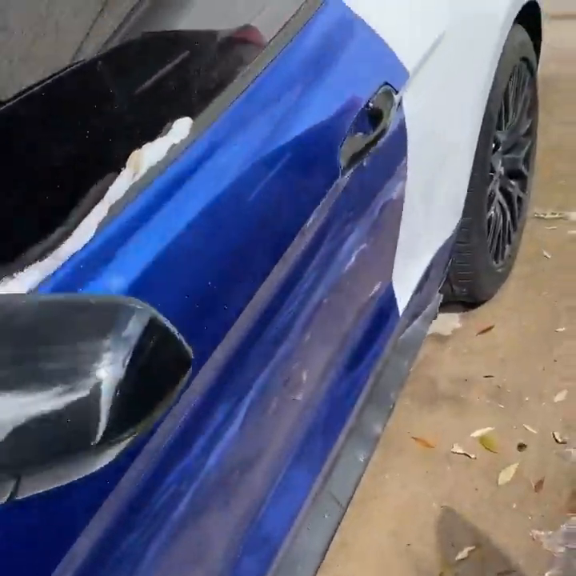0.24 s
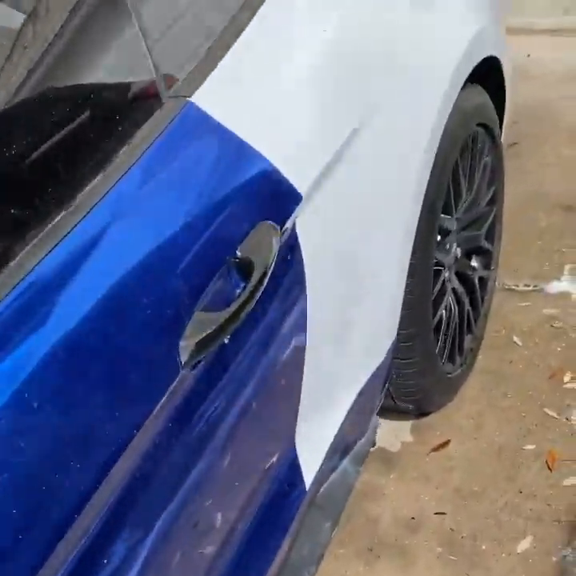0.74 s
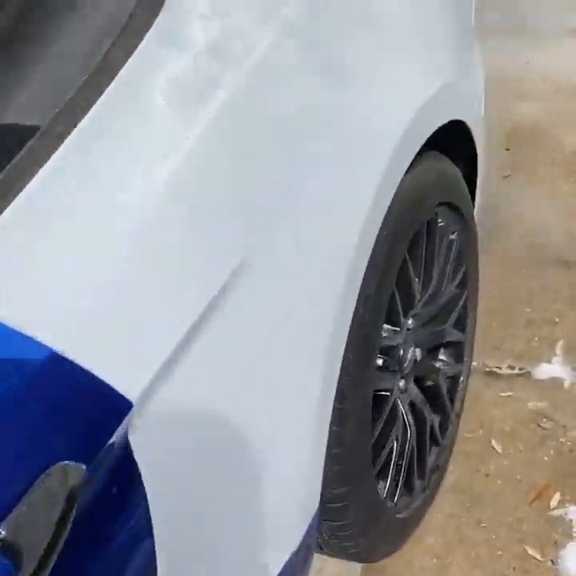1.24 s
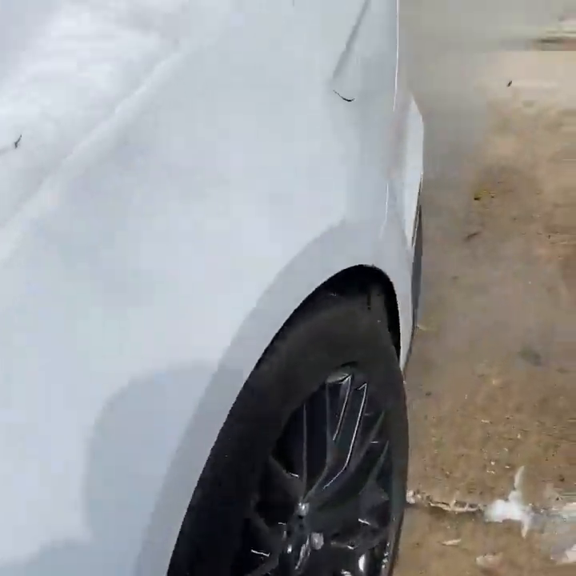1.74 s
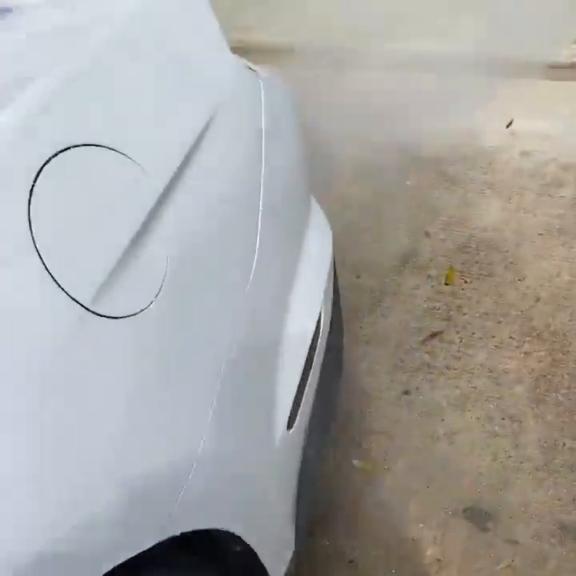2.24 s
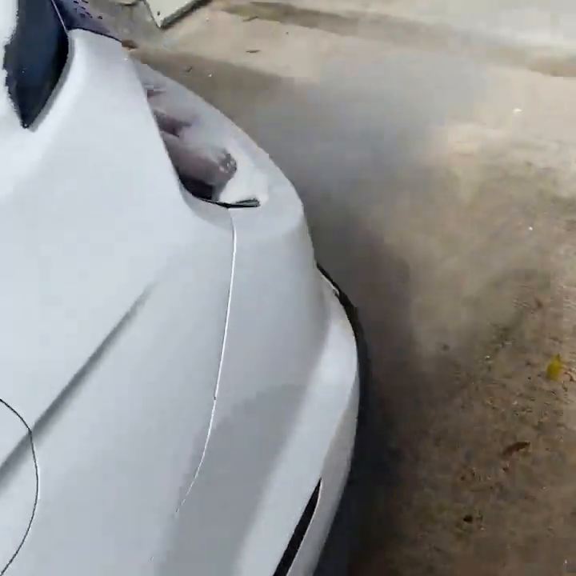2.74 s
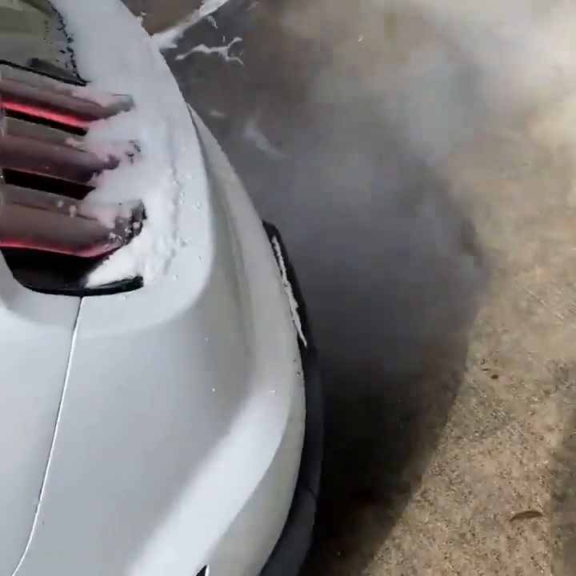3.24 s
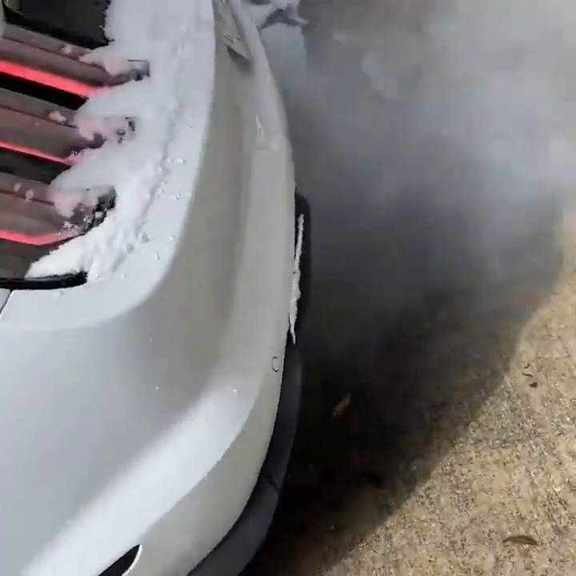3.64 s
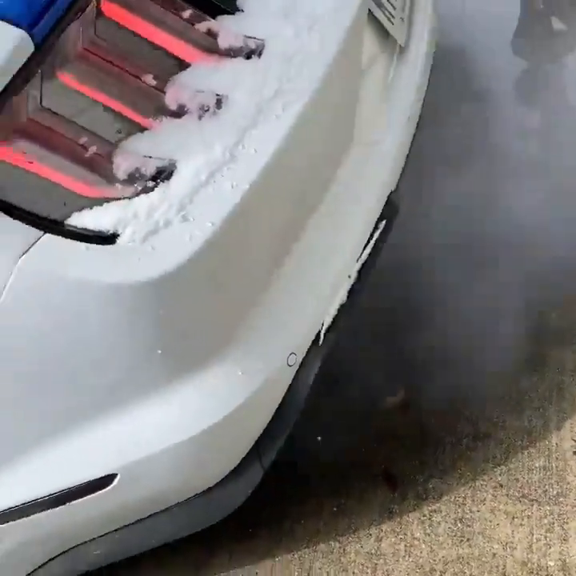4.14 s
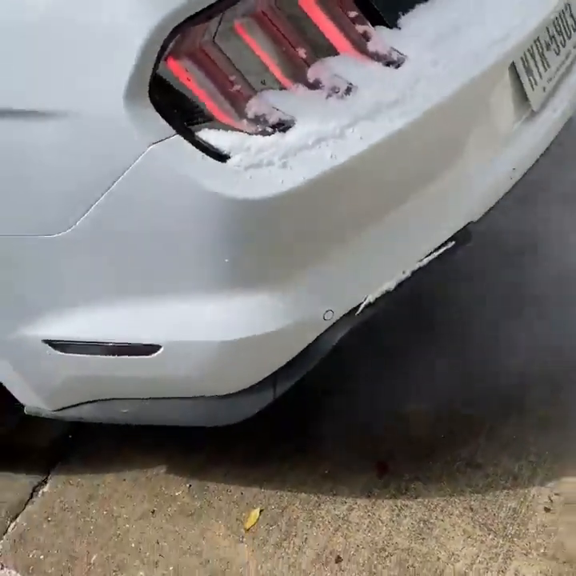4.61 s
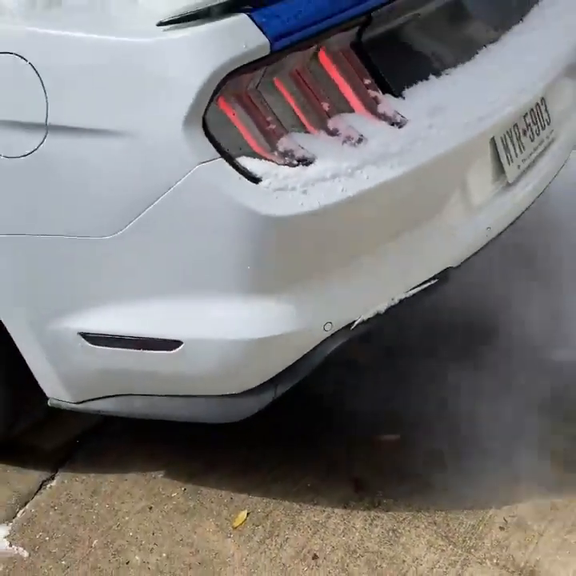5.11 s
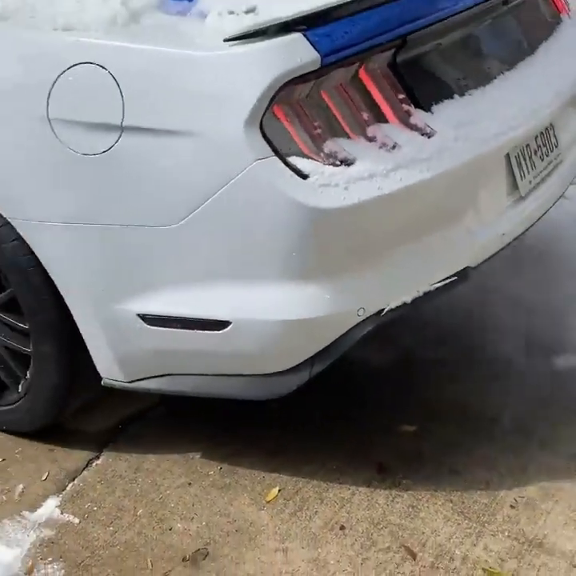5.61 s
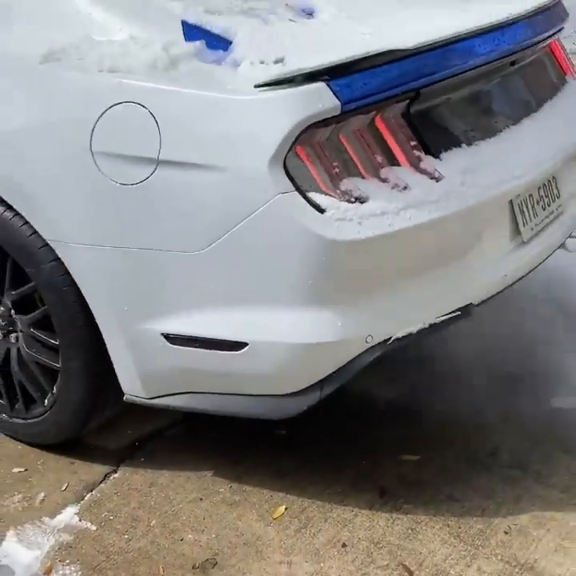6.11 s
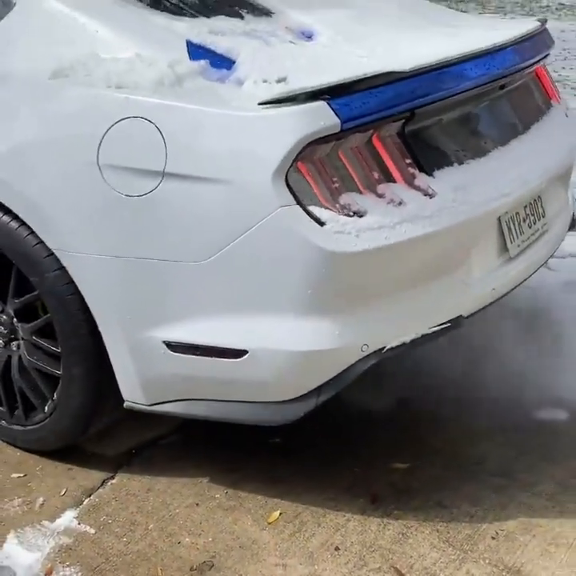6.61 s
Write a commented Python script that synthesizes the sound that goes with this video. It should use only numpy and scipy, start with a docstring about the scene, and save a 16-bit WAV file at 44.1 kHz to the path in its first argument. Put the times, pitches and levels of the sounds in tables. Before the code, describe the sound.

A V8 car with an open exhaust idles on a concrete driveway. Its deep boom and drone throb quickly and evenly, with raspy pops and chuffs on top and a faint hiss below. The close microphone moves from beside the door around the rear bumper, where the boom eases and a brief hollow howl rises. Behind the car, the idle carries on slightly quieter.

```python
"""A V8 with open exhaust pipes idles on a concrete driveway, heard first from beside its door.
From the start, three hard and five softer firings per cycle make the pipe's boom and drone throb
eleven times a second. Firings pop and spit rasping gas, the hard ones chuff, and a thin hiss lies below.
Near 2.6 seconds the microphone rounds the bumper: the boom drops and the space underneath howls briefly.
By about six seconds the microphone is behind the tail, where the engine sounds a little quieter."""
import sys
import numpy as np
from scipy import signal
from scipy.fft import rfft, irfft, next_fast_len
from scipy.io import wavfile
from scipy.ndimage import uniform_filter1d, minimum_filter1d, map_coordinates

SR = 44100
rng = np.random.default_rng(int(sys.argv[2]) if len(sys.argv) > 2 else 0)


def persist_wave(psi):
    """Save psi, clipped to +-1, as 16-bit WAV."""
    counts = np.round(np.clip(psi, -1, 1) * 32767).astype(np.int16)
    wavfile.write(sys.argv[1], SR, np.atleast_2d(counts).T)


N = 302526

# Idle speed. Each row: time in seconds, firings per second.
IDLE_SPEED = [(0, 90.58), (2, 91.77), (2.5, 90.35), (2.8, 91.39), (4.65, 91.59), (5.3, 90.98), (6.86, 91.6)]
# One engine cycle. Each row: a firing's lateness in ms, pressure pulse in dB, gas jet in dB.
CYCLE_FIRINGS = [(-0.272, 3.5, 5.5), (-0.712, 7.5, 5.5), (-0.722, 7, 6.5), (0.104, -3.5, 2.5),
                 (-0.33, -7.5, 1.5), (-0.088, 4, 1.5), (0.036, 1.84, -1), (1.116, 1, 1)]
# Cycles that burn harder and bark. Each row: time in seconds, boost to the firing kicks in dB.
HARD_BURNS = [(0.105, 2.2), (0.195, 2.2), (0.365, 1), (0.45, 1.5), (1.59, 2), (1.94, 2.5), (2.73, 0.9),
              (3.178, 3.8), (3.44, 2.3), (3.7, 1), (3.87, 1.3), (4.04, 2), (4.391, 3), (4.57, 1),
              (4.66, 2.5), (5.09, 3), (5.27, 3), (5.53, 2.2), (5.62, 1.8), (6.15, 1), (6.5, 1), (6.67, 2)]
# The walk. Each row: time in seconds, position from 0 (beside the car) to 1 (behind it).
MIC_POSITION = [(0, 0.0074), (1.8, 0.08), (2.6, 0.46), (3.2, 0.19), (4.6, 0.81), (5.2, 0.78), (5.7, 0.97),
                (6.86, 0.96)]
# How strongly the exhaust reaches the microphone. Each row: time in seconds, level in dB.
EXHAUST_REACH = [(0.1, 4), (0.9, -0.5), (1.7, 1.5), (2.3, 0.9), (3.15, 2), (3.3, -3.5), (4.3, -1),
                 (5.3, -4.5), (6.86, -3.5)]
# The engine's tones. Each row: multiple of the cycle rate, then relative level in dB
# at the three places: beside the car, at its corner, behind it.
ENGINE_TONES = [(4, -41.5, -39.5, -42), (5, -46, -47.5, -51), (6, -44, -41.5, -48), (7, -32, -37.5, -43),
                (8, -5.5, -10.5, -16.5), (9, -36, -34.5, -34.5), (10, -29.5, -30, -30.5),
                (11, -27.5, -29.5, -30), (12, -34, -23, -30.5), (13, -24.5, -24.5, -30.5),
                (14, -29.5, -25.5, -33), (15, -42, -34, -47), (16, -20.5, -22, -24.5),
                (17, -26, -28.5, -29), (18, -20, -25, -24.5), (19, -43, -35.5, -46), (20, -34, -25.5, -32),
                (21, -42, -26, -29), (22, -31, -24, -28), (23, -25.5, -25.5, -24), (24, -18, -14.5, -17.5),
                (25, -19.5, -22.5, -15.5), (26, -30, -23, -25.5), (27, -57, -47, -43),
                (28, -40.5, -50, -46.5), (29, -39, -49.5, -56), (30, -34.5, -35.5, -40),
                (31, -46, -38, -49), (32, -34.5, -35.5, -41.5), (33, -21.5, -24, -36.5),
                (34, -43, -32.5, -34.5), (35, -42, -42, -48), (36, -46, -39.5, -49), (37, -39.5, -34, -43),
                (38, -61, -44.5, -55), (39, -41, -36, -46), (40, -52, -53.5, -58), (41, -52, -50, -53.5),
                (42, -41, -34.5, -41), (43, -36, -38, -42), (44, -40.5, -41, -45.5),
                (45, -37.5, -36, -35.5), (46, -30.5, -38.5, -39.5), (47, -44, -49, -52),
                (48, -45, -57.5, -53.5), (49, -36, -34.5, -52), (50, -46, -45, -52), (51, -38.5, -38, -54),
                (52, -59, -59.5, -55.5), (53, -46.5, -43.5, -50), (54, -61, -53, -57.5),
                (55, -35.5, -35.5, -35), (56, -38, -39, -40.5), (57, -34, -37.5, -34),
                (58, -45.5, -55.5, -52)]
# Standing waves in the pipe. Each row: pitch in Hz, width in Hz, strength with a sign.
PIPE_WAVES = [(80.4, 5.9, 0.52), (118, 12, 0.79), (209.6, 100, -0.048), (276.36, 4.86, -0.193),
              (375, 4.5, 0.043), (417.7, 5.5, .052), (512.7, 50, .125), (554, 26.1, -.2), (645.7, 6, -.046)]
# Where the two tailpipes cancel each other. Each row: time in seconds, pitch in Hz, depth in dB.
PIPE_CANCELLING = [(0.2, 246, 3.5), (0.62, 280, 5.5), (1.1, 250, 3.5), (1.5, 251, 4), (2.1, 256.4, 10.5),
                   (2.55, 276, 14), (2.75, 303, 12), (2.9, 318, 0.5), (6.86, 343, 5)]
# The hum, three tones around the 375 Hz standing wave. Each row: time in seconds, level in dB.
HUM_LOUDNESS = [(0.1, -22), (0.26, -20), (0.75, -22), (1.45, -38.5), (2.0, -20.5), (2.35, -28), (2.7, -18),
                (2.9, -14.5), (3.05, -16), (3.35, -26), (3.6, -29), (4.0, -19), (4.25, -21), (4.5, -26),
                (4.85, -23.5), (5.4, -30.5), (6.3, -38.5), (6.75, -33.5)]
# The honk, the tones from about 420 Hz up. Each row: time in seconds, level in dB.
HONK_LOUDNESS = [(0.2, -23.5), (0.9, -27.5), (1.3, -28), (1.65, -22.5), (2.15, -28.5), (2.5, -24.5),
                 (3.0, -24), (3.4, -28), (3.8, -25.5), (4.45, -25), (5.1, -35.5), (5.7, -29.5), (6.4, -34),
                 (6.8, -33.5)]
# High ringing of pipe and underbody. Each row: pitch in Hz, width in Hz, relative dB at the three places.
HIGH_RINGS = [(749, 45, -13.5, -20, -12), (808.6, 14, -5.5, -14.5, -1), (853, 15, -12, -8, -3.5),
              (945, 17.3, -4, -2.5, -12), (987, 18.6, -10, -1.5, -12.5), (1068, 26, -4.5, -4, -1.5),
              (1126.5, 47, -6.5, -8.5, -8.5), (1291, 33, -7, -5.5, -5), (1353, 25, -8, -17.5, -7.5),
              (1475.5, 23.7, -4.5, -7.5, 2.5), (1557, 24, -9, -14.5, -11), (1610, 33, -8.5, -9.5, -8.5),
              (1668, 26, -10.5, -13.5, -12.5), (1740, 25, -6.5, -7, -12), (1894, 24, -11.5, -15, -18),
              (2006, 20, -9, -11.5, -11), (2083.5, 19, -10, -9, -17.5), (2196, 34, -12, -12, -8.5),
              (2374, 23, -10, -11, -15), (2514, 27, -12, -13, -9), (2670, 45, -14.5, -14.5, -10),
              (2756, 35, -12.5, -18.5, -14.5), (2935, 36, -17, -10.5, -12), (3115, 32, -22.5, -16, -13.5),
              (3234, 36, -18, -10.5, -13.5), (3738, 60, -12.5, -14, -25.5)]
# Tone colour of the pops. Each row: frequency in Hz, relative level in dB.
POP_COLOUR = [(300, -30.5), (700, 1.0), (1700, -8.5), (2600, -11), (3700, -14), (5000, -22)]
# Tone colour of the rasp, with a deep dip near 8 kHz. Each row: frequency in Hz, relative dB at the three
# places.
RASP_COLOUR = [(250, -37, -43, -37.5), (453, -8.5, -7, -11.5), (700, 2.5, -2, -1), (1000, 2, 2.5, 2.5),
               (1600, -5.5, -10, -4.5), (2080, -2.5, -3.5, -7), (3100, -8, -6.5, -7),
               (3570, -8.5, -11.5, -14), (4500, -13.5, -13, -13), (5100, -16, -14.5, -16.5),
               (5600, -15.5, -14, -14), (7270, -21.5, -19.5, -18.5), (7900, -43, -46, -44.5),
               (14100, -26, -26.5, -31)]
# Tone colours of chuff, rumble and hiss. Each row: frequency in Hz, relative level in dB.
CHUFF_COLOUR = [(700, -26), (1250, -2), (1480, 0.5), (1750, 1), (2150, 0.5), (2500, -2.5), (3250, -2),
                (3600, -8), (6000, -26)]
RUMBLE_COLOUR = [(15, -9), (30, -11), (48, -12.5), (90, -4), (170, -17), (280, 0.5), (400, -10.5),
                 (600, -10.5), (1200, -47.5)]
HISS_COLOUR = [(800, -20), (3000, 4), (6000, 3), (10000, 0), (12500, -5), (14300, -14)]
# How strong the chuffs are. Each row: time in seconds, level in dB.
CHUFF_LOUDNESS = [(0, -28), (.5, -30), (1.2, -33.5), (1.7, -31), (2.6, -32.5), (3.4, -29.5), (4.2, -33),
                  (5.3, -34.5), (5.9, -34), (6.86, -33.5)]
# The bounce off concrete and bodywork. Each row: time in seconds, extra delay in ms.
BOUNCE_DELAY = [(0, 0.49), (1.6, 0.99), (2.8, .76), (4.2, 0.92), (5.4, 1.0), (6.86, 1.27)]
# Hollows of sill, wheel arch and bumper. Each row: time passed in seconds, half length in seconds,
# pitch in Hz, glide in Hz per second, width in Hz, gain.
BODY_HOLLOWS = [(0.247, 0.64, 710, 203, 88, 1.5), (0.2, 0.3, 1710, 1, 201, 0.32),
                (0.58, 0.32, 1460, -41.5, 36, 1.3), (1.107, 0.19, 1340, 1.5, 50, 1.2),
                (1.55, 0.27, 914, -30.5, 30, 2.6), (1.6, .2, 1180, 0, 60.4, .7),
                (1.95, 0.33, 1040, -160, 60, 1.2), (3.552, .5, 894, -20.5, 50, 1.7),
                (3.25, 0.33, 1380, 1, 79.6, 0.63), (5.7, .25, 1323, 120, 59.4, 1.1),
                (6.2, 0.65, 853, 20, 50, 1)]
# Stereo balance. Each row: frequency in Hz, left minus right in dB.
SIDE_BALANCE = [(60, -0.4), (150, 1.3), (300, 2.5), (650, 3.5), (1400, 0.2), (3000, -1), (10000, 0)]
# How alike left and right noise are. Each row: frequency in Hz, likeness (1 means the same).
SIDE_LIKENESS = [(300, .95), (700, .7), (1500, .82), (3000, .76), (6000, .66), (12000, .6)]

TIME = np.arange(N) / SR


def amp(db):
    """Turn decibels into a gain."""
    return 10 ** (np.asarray(db) / 20)


def unit(x):
    """Scale a signal to an average (rms) level of 1."""
    return x / np.sqrt(np.mean(x ** 2) + 1e-20)


def along(points, hz):
    """Read a table of frequencies and values at hz, on a log scale."""
    freqs, values = np.transpose(points)
    return np.interp(np.log(hz + 1), np.log(freqs), values)


def curves(rows):
    """Give one value per sample for each column after the time."""
    seconds, *columns = np.transpose(rows)
    return [np.interp(TIME, seconds, column) for column in columns]


def passing(centre_s, half_s):
    """A bell-shaped swell that reaches 1 at centre_s."""
    return np.exp(-((TIME - centre_s) / half_s) ** 2)


def wobble(rate):
    """A smooth curve through `rate` random values a second."""
    knots = rng.standard_normal(int(N * rate / SR) + 4)
    coarse = np.arange(0, N, 64)
    return np.interp(np.arange(N), coarse, map_coordinates(knots, [coarse * rate / SR]))


def filtered(x, response):
    """Filter x; response gives the gain and phase at each frequency."""
    size = next_fast_len(N + SR // 2)
    return irfft(rfft(x, size) * response(np.fft.rfftfreq(size, 1 / SR)), size)[..., :N]


def resonance(f, centre, width):
    """How one standing wave answers a push at frequency f."""
    return 1j * f * width / (centre ** 2 - f ** 2 + 1j * f * width)


def place_shares(corner):
    """Blend the three places along the walk; `corner` is the position of the middle one."""
    position, = curves(MIC_POSITION)
    return [np.interp(position, [0, corner, 1], place) for place in np.eye(3)]


def firings(firing_count, scatter_db=0.8, jitter_ms=0.042):
    """One kick each time an exhaust valve opens, sized by its cylinder and bigger in a bark."""
    number = np.arange(int(firing_count[-1]))
    late_ms, _, jet_db = np.array(CYCLE_FIRINGS)[number % len(CYCLE_FIRINGS)].T
    timing_luck, size_luck = rng.standard_normal((len(number), 2)).T
    delay = (late_ms + jitter_ms * timing_luck) * SR / 1000
    starts = np.clip(np.searchsorted(firing_count, number) + delay, 0, N - 1).astype(int)
    bark_db = sum(db * passing(seconds, 0.018) for seconds, db in HARD_BURNS)
    return amp(bark_db) * np.bincount(starts, amp(jet_db + scatter_db * size_luck), N)


def puffs(kicks, rise_s, drain_s):
    """The gas flow swells quickly at every kick, then drains away."""
    t = np.arange(SR // 10) / SR
    shape = (1 - np.exp(-t / rise_s)) * np.exp(-t / drain_s)
    return np.sqrt(np.abs(signal.fftconvolve(kicks ** 2, shape ** 2)[:N]))


def held_at(x, db):
    """Even out x over half a second, then set its level."""
    return amp(db) * x / np.sqrt(np.abs(uniform_filter1d(x ** 2, SR // 2)) + 1e-12)


def pipe_tone(firing_count, reach_db, lag_ms=3.4):
    """The firing pattern rings the pipe, making tones grouped as boom, drone, hum and honk."""
    cylinders = len(CYCLE_FIRINGS)
    late_ms, pulse_db, _ = np.transpose(CYCLE_FIRINGS)
    cycle_hz = firing_count[-1] / cylinders * SR / N
    valve_opens = np.arange(cylinders) / cylinders + (late_ms + lag_ms) * cycle_hz / 1000
    cycle_count = (firing_count + 0.011 * wobble(30)) / cylinders
    cancel_hz, cancel_db = curves(PIPE_CANCELLING)
    cancel_width_hz, howl_hz, howl_width_hz = 20, 486, 22
    howl_db = 8 * passing(2.68, 0.52)  # the space under the bumper howls near the corner
    shares = np.array(place_shares(corner=0.37))
    boom, drone, hum, honk = np.zeros((4, N))
    for multiple, *levels_db in ENGINE_TONES:
        hz = multiple * cycle_hz
        # the firing pattern and the pipe decide when each tone crests
        pattern = np.sum(amp(pulse_db) * np.exp(-2j * np.pi * multiple * valve_opens))
        pipe = sum(strength * resonance(hz, pitch, width) for pitch, width, strength in PIPE_WAVES)
        phase = 2 * np.pi * multiple * cycle_count + np.angle(pattern * pipe)
        tone = (amp(levels_db) @ shares) * np.cos(phase)
        if multiple == cylinders:  # the firing rate, near the pipe's deepest standing wave
            boom += tone
        elif 32 <= multiple <= 34:
            hum += tone
        elif multiple < 37:
            dip_db = cancel_db / (1 + ((hz - cancel_hz) / cancel_width_hz) ** 2)
            drone += tone * amp(0.67 * wobble(9) - dip_db)
        else:  # short waves add up differently with every step
            lift_db = howl_db / (1 + ((hz - howl_hz) / howl_width_hz) ** 2)
            honk += tone * amp(1.8 * wobble(2.5) + lift_db)
    past_bumper = np.clip((TIME - 2.6) / 0.54 + 0.5, 0, 1)
    return (held_at(boom, -11 + 0.32 * reach_db - 2 * past_bumper)
            + held_at(drone, -10.5 + 0.54 * reach_db - 0.32 * cancel_db)
            + held_at(hum, curves(HUM_LOUDNESS)[0])
            + held_at(honk, curves(HONK_LOUDNESS)[0]))


def ringing(blows, colour):
    """Blows set pipe and underbody ringing, in a mix that changes along the walk."""
    def response(f):
        rings = [(-1) ** k * resonance(f, hz, width) for k, (hz, width, *_) in enumerate(HIGH_RINGS)]
        place_gains = amp(np.array(HIGH_RINGS)[:, 2:]).T
        return (amp(along(colour, f)) * (place_gains @ np.array(rings)))[:, None]
    places = filtered(blows, response)
    return sum(share * unit(sound) for share, sound in zip(place_shares(corner=0.74), places))


def pops(kicks):
    """Each pressure front, with a short burst of swirling gas, strikes the high rings."""
    burst = puffs(kicks, rise_s=0.00055, drain_s=0.01) * rng.standard_normal(N)
    return ringing(unit(kicks) + 0.45 * unit(burst), POP_COLOUR)


def rush(colour, flow=1):
    """Rushing stereo noise that follows the flow; left and right are less alike in the treble."""
    def response(f):
        spread = np.arccos(along(SIDE_LIKENESS, f)) / 2
        return amp(along(colour, f)) * [np.cos(spread), np.sin(spread)]
    mid, side = filtered(rng.standard_normal((2, N)) * flow, response)
    return unit(np.array([mid + side, mid - side]))


def gas_rasp(flow):
    """Gas swirling at the pipe mouths swells with the flow and changes colour along the walk."""
    colours = np.array(RASP_COLOUR)
    return sum(np.sqrt(share) * rush(colours[:, [0, column]], flow)
               for column, share in enumerate(place_shares(corner=0.68), start=1))


def chuffs(kicks):
    """The hardest firings drive the gas fast enough to spit short, ringing bursts."""
    hard_kicks = kicks ** 1.75  # big kicks now tower over small ones
    spit = puffs(hard_kicks, rise_s=0.0003, drain_s=0.008) * rng.standard_normal((2, N))
    return ringing(unit(hard_kicks) + 0.8 * unit(spit), CHUFF_COLOUR)


def bounce(x, share=0.11):
    """An echo off concrete and bodywork shifts with the walk, sliding peaks and dips through x."""
    delay_s = curves(BOUNCE_DELAY)[0] / 1000
    echo = np.array([np.interp(TIME - delay_s, TIME, channel) for channel in x])
    return (x + share * echo) / np.sqrt(1 + share ** 2)


def hollows(x):
    """Each hollow in the car adds a gliding ring that swells and fades as the microphone passes."""
    out = x.copy()
    for seconds, half_s, hz, glide, width, gain in BODY_HOLLOWS:
        spin = np.exp(2j * np.pi * np.cumsum(hz + glide * (TIME - seconds)) / SR)
        keep = np.exp(-np.pi * width / SR)
        # shift the hollow's pitch down to 0 Hz, smooth, and shift it back
        ring = 2 * np.real(spin * signal.lfilter([1 - keep], [1, -keep], x / spin))
        out += gain * passing(seconds, half_s) * ring
    return out


def microphone(x, lead_samples=2.8):
    """Sound reaches the left side a little earlier and, in the lower middle range, louder."""
    side = np.array([[0.5], [-0.5]])
    lead_s = side * lead_samples / SR
    return filtered(x, lambda f: amp(side * along(SIDE_BALANCE, f)) * np.exp(2j * np.pi * f * lead_s))


def scene():
    """One crankshaft times the pipe tone, pops and gas noise, over a steady hiss."""
    firing_count = np.cumsum(curves(IDLE_SPEED)[0]) / SR
    reach_db, = curves(EXHAUST_REACH)
    kicks = firings(firing_count)
    flow = unit(puffs(kicks, rise_s=0.0006, drain_s=0.029))
    tone = pipe_tone(firing_count, reach_db)
    popping = amp(-30.5 + reach_db) * pops(kicks ** 0.72)  # a power below 1 evens out the kicks
    rasp = amp(-30 + reach_db + 0.52 * wobble(11)) * gas_rasp(flow ** 0.84)
    chuffing = amp(curves(CHUFF_LOUDNESS)[0]) * chuffs(kicks)
    rumble = amp(-27) * rush(RUMBLE_COLOUR, flow)
    hiss = amp(-51.5) * rush(HISS_COLOUR)
    return microphone(tone + hollows(bounce(popping + rasp + chuffing)) + rumble + hiss)


def record(dry, ceiling=0.92, top_hz=14100):
    """A limiter turns the level down just ahead of big peaks; everything above top_hz is cut."""
    needed = np.minimum(1, ceiling / (np.abs(dry).max(axis=0) + 1e-9))
    gain = uniform_filter1d(minimum_filter1d(needed, size=441), size=441)  # 10 ms windows
    return filtered(dry * gain, lambda f: f < top_hz)


dry = scene()
out = record(dry)
persist_wave(out)
```